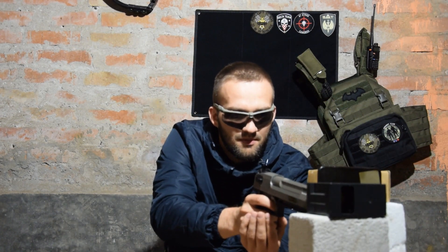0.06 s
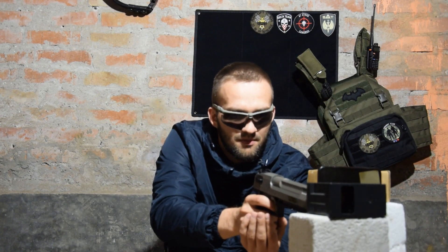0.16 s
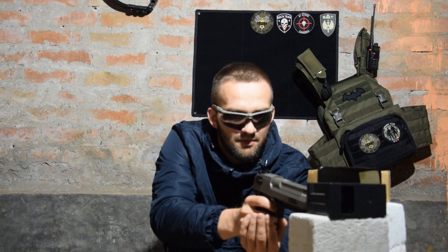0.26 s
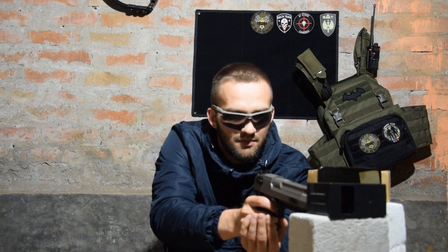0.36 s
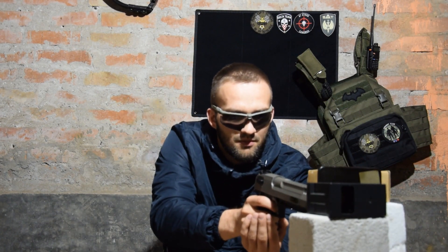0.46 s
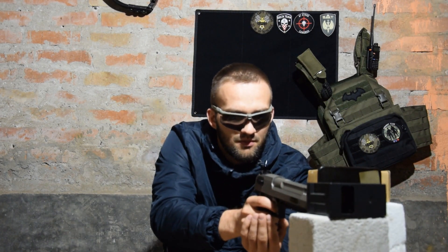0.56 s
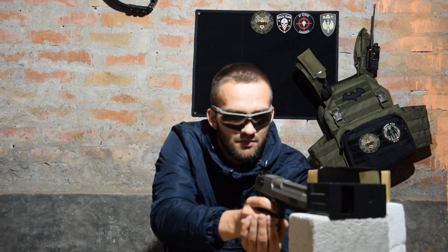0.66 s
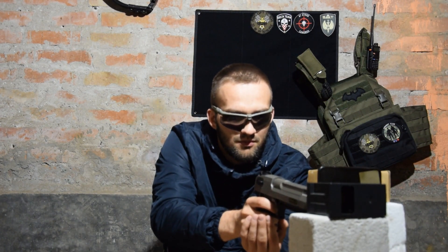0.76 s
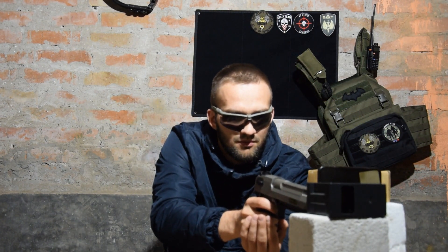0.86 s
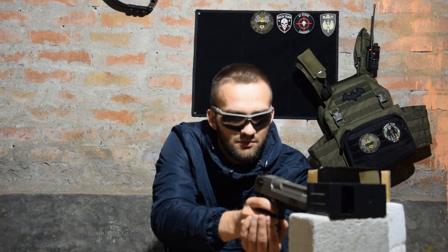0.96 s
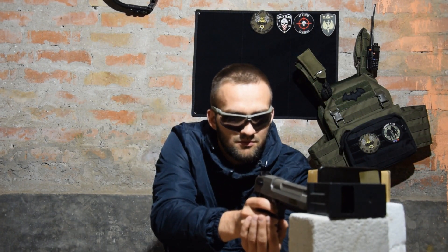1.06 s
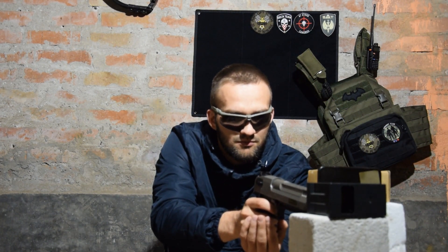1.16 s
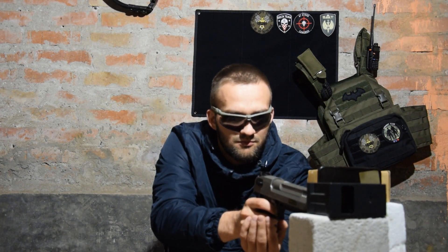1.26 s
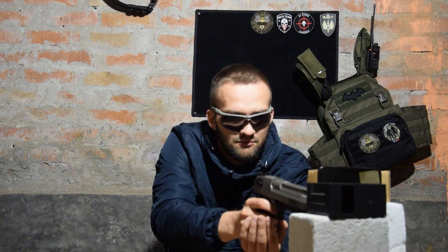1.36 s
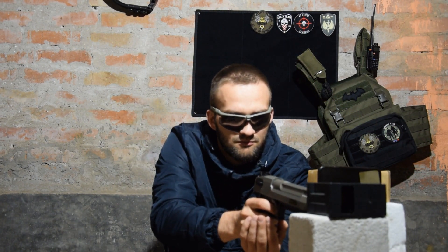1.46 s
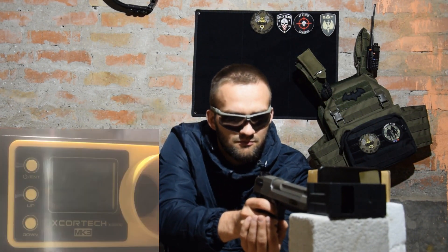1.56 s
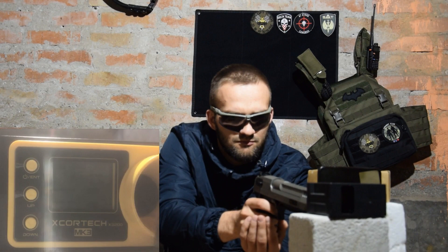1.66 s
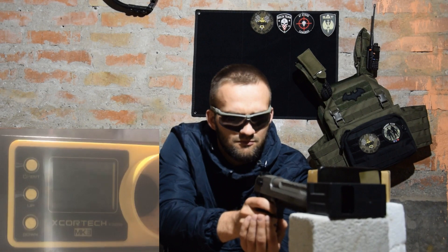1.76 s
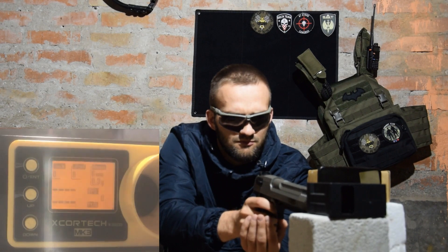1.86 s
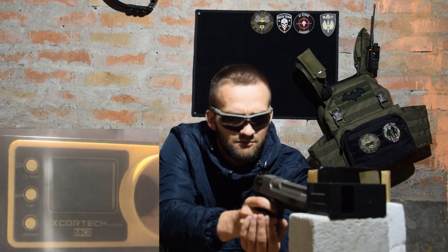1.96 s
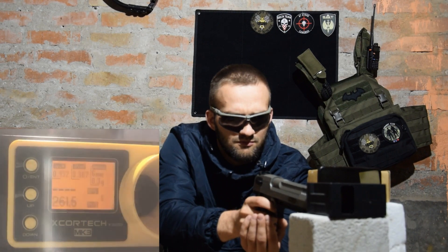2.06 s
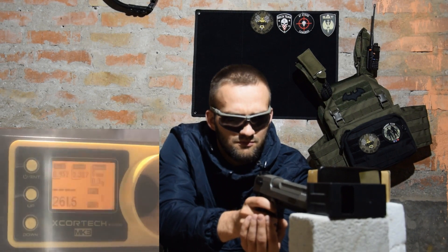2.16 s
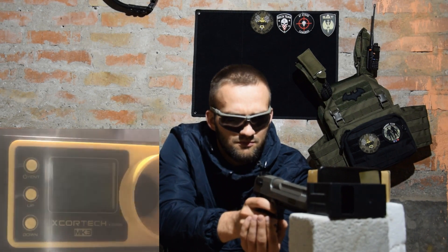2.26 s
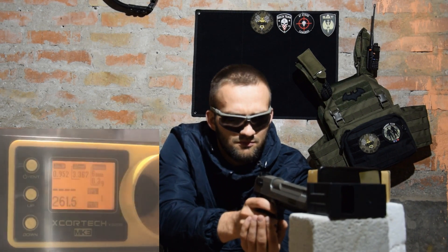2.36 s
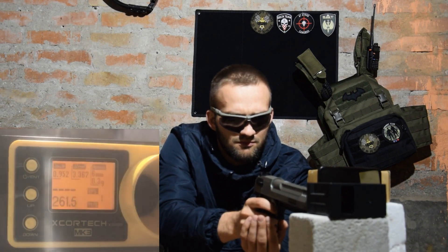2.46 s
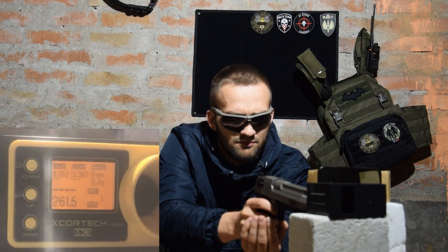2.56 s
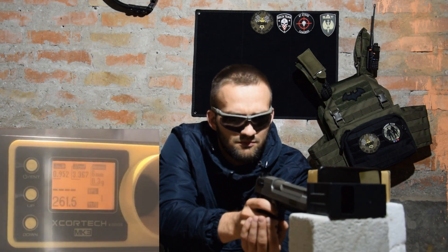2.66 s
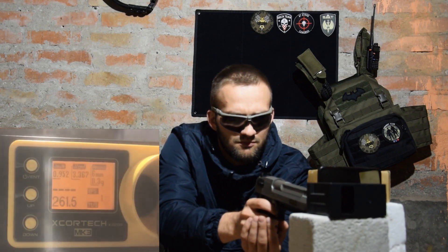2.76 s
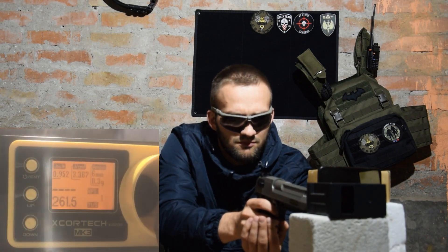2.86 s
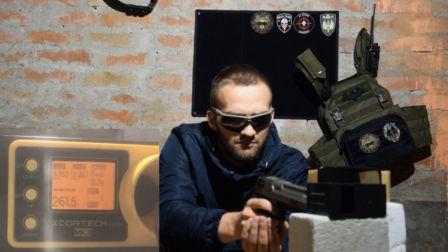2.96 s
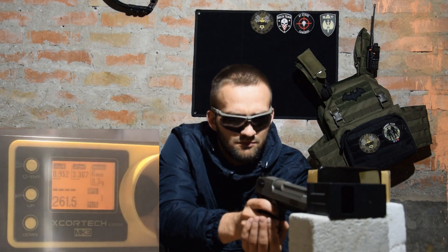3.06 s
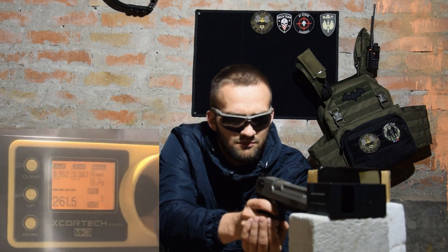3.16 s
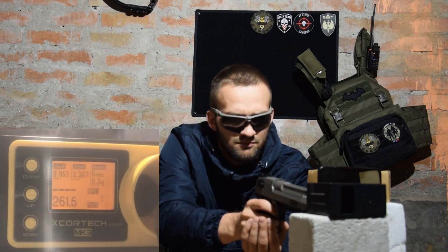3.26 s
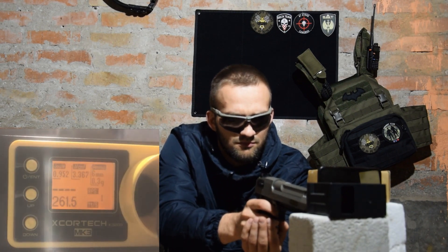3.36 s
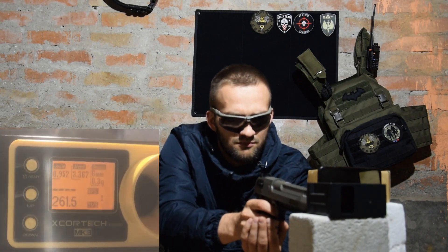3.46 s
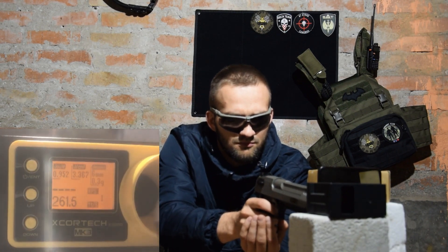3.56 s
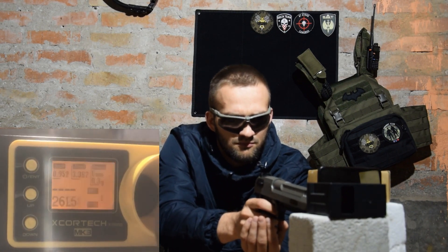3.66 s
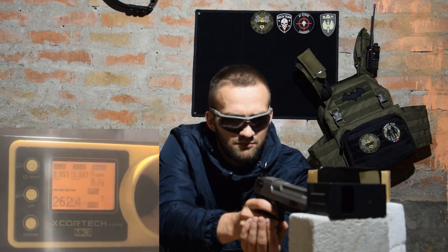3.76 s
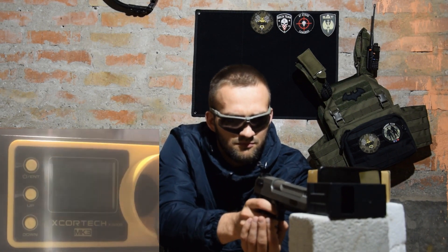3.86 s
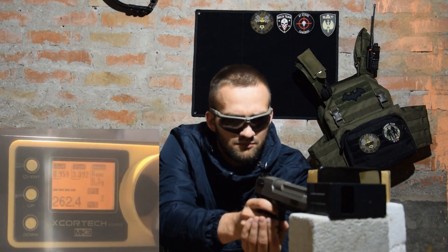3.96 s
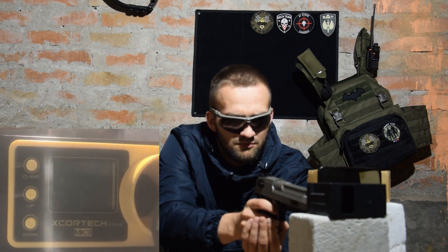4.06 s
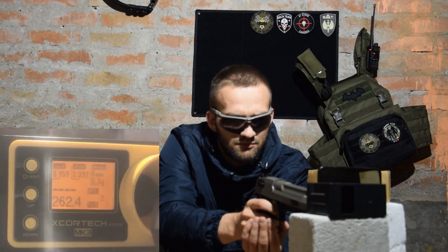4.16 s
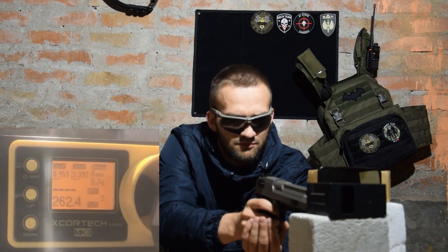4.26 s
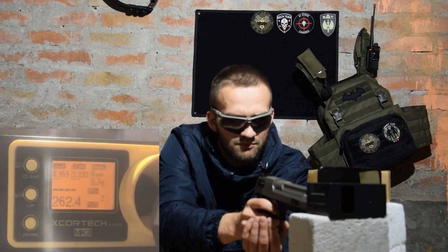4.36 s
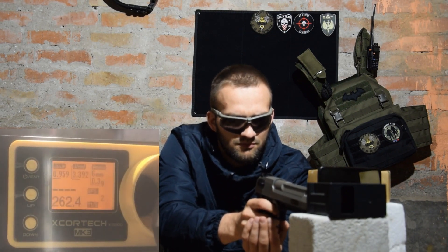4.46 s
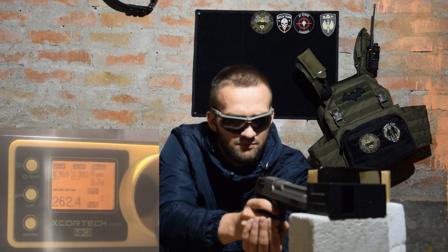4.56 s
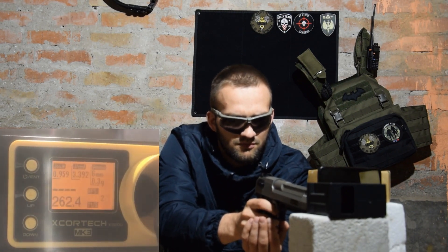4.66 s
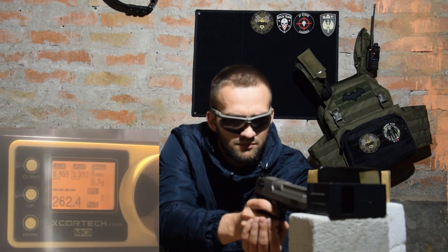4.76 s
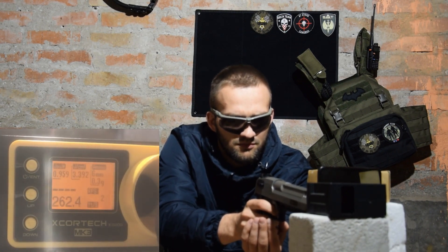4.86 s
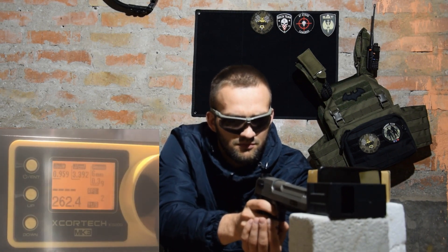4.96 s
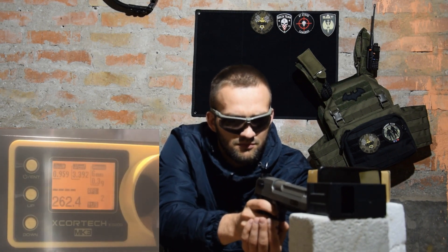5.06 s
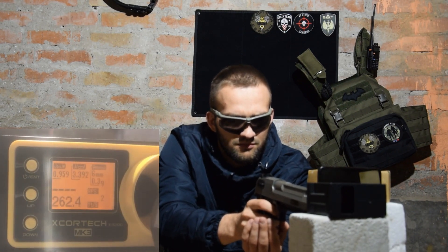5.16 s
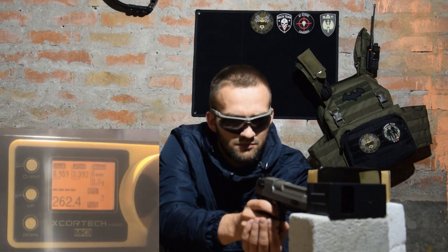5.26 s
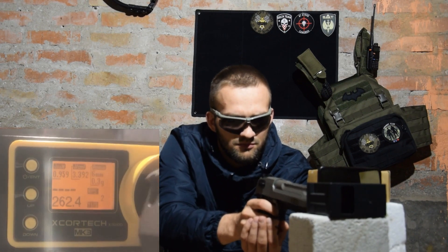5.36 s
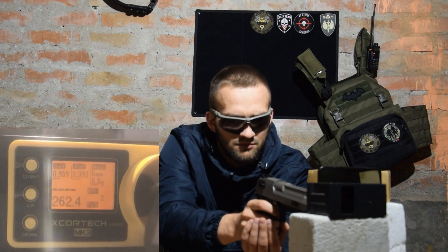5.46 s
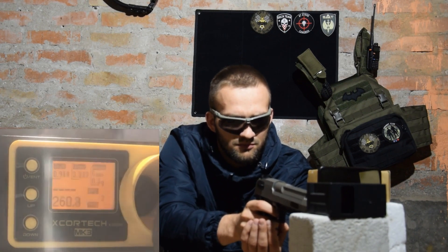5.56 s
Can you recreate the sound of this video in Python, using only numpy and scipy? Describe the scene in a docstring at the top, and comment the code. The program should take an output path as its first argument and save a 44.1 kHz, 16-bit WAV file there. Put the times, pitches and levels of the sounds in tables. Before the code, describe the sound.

A small, hard-walled room is heard through one close microphone, with faint steady hiss, the soft whirring of a small appliance and a very thin high whine throughout. Only this background sounds until about 1.7 seconds, when a faint double tick leads straight into the first shot of a gas airsoft pistol: a sharp hammer crack, a short burst of gas with a low puff, then the metal slide slamming shut some 60 milliseconds later, ringing briefly and overloading the microphone. Sharp clicks like a ricocheting pellet follow at 2.07 to 2.17 seconds, dull knocks around 2.5, and another click at 2.8. Light ticks and a small click come at 3.2 to 3.5, before the second shot at 3.5. Soft knocks fall at 3.8 and, fainter, 5.0. The third shot fires at 5.3 after another tick, then a padded knock and two hard clicks land around 5.5 to 5.6.

```python
"""A gas blowback airsoft pistol fires in a small brick-walled space, close to one microphone.
Faint hiss, whirring bands (filtered noise) and a thin whine (a sine) run throughout; a double tick precedes
the first shot. Three shots follow, about 1.8 s apart: hammer blow, gas burst, slide slamming shut, built from
shaped pulses, noise and dying sines that overload the microphone input. After the first shot come sharp clicks,
likely pellets ricocheting, and dull knocks, with more ticks before the later shots and two hard clicks at the end."""
import sys
import numpy as np
from scipy import signal
from scipy.fft import rfft, irfft
from scipy.io import wavfile

SR = 44100
rng = np.random.default_rng(int(sys.argv[2]) if len(sys.argv) > 2 else 0)


def generate_wav(signal):
    """Clip the signal to [-1, 1] and save it as 16-bit WAV at the path in sys.argv[1]."""
    frames = np.transpose(np.atleast_2d(signal))
    scaled = np.clip(frames, -1, 1) * 32767
    pcm = np.round(scaled).astype(np.int16)
    wavfile.write(sys.argv[1], SR, pcm)


N = 248062
# time axis of one event (s)
T = np.arange(int(.7 * SR)) / SR


def amp(db):
    """Decibels to gain."""
    return 10 ** (np.asarray(db) / 20)


def unit(x):
    """Scales to an energy of one."""
    return x / np.sqrt(np.sum(x ** 2) + 1e-20)


def read(points, hz):
    """Reads a table on a log-frequency axis."""
    table_hz, value = np.transpose(points)
    return np.interp(np.log(hz + 1), np.log(table_hz + 1), value)


def add(mix, start_s, sound):
    """Mixes a sound in at its start time."""
    part = mix[round(start_s * SR):][:len(sound)]
    part += sound[:len(part)]


def through(x, response):
    """Convolves and keeps the length."""
    return signal.fftconvolve(x, response)[:len(x)]


def pulse(spectrum, tilt_db=0, treble_db=0, size=4096):
    """A causal pulse of unit energy with the given spectrum, tilted in dB per octave above 500 Hz."""
    hz = abs(np.fft.fftfreq(size, 1 / SR))
    tilt = tilt_db * np.log2(np.maximum(hz, 500) / 500)
    treble = treble_db * np.clip((hz - 8000) / 2000, 0, 1)  # shelf, full from 10 kHz up
    log_gain = np.log(amp(read(spectrum, hz) + tilt + treble))
    # minimum phase puts the energy at the start
    shape = np.fft.ifft(np.exp(np.conj(signal.hilbert(log_gain)))).real
    return unit(np.pad(shape[:size // 2], (0, len(T) - size // 2)))


def ring(modes):
    """Dying sines of unit energy."""
    return unit(sum(amp(db - 60 * T / t60) * np.sin(2 * np.pi * hz * T) for hz, db, t60 in modes))


def resound(modes, rise_s, pitch=1):
    """Modes that build up over many reflections, so they start softly and out of step."""
    waves = 0
    for hz, db, t60 in modes:
        cycles = pitch * hz * T + rng.random()
        waves = waves + amp(db - 60 * T / t60) * np.sin(2 * np.pi * cycles)
    return unit(waves * (1 - np.exp(-T / rise_s)))


def burst(delay_s, rise_s, hold_s, t60_s):
    """Turbulence: noise that swells, holds and dies away."""
    age = np.maximum(T - delay_s, 0)
    swell = 1 - np.exp(-age / rise_s)
    fade = amp(-60 * np.maximum(age - hold_s, 0) / t60_s)
    return rng.standard_normal(len(T)) * swell * fade


def contact(length_s):
    """The brief rough contact of two hard parts: dying noise, evened in spectrum, then faded further."""
    z = rfft(rng.standard_normal(len(T)) * amp(-60 * T / length_s))
    even = irfft(z / (abs(z) + 1e-9), len(T))
    return unit(even * amp(-20 * T / length_s))


# decay of the walled space, columns: pitch_hz, t60_s
ROOM_DECAY = [(100, 0.2), (400, 0.34), (1000, 0.26), (3000, 0.23), (6500, 0.22), (10000, 0.17),
              (16000, 0.1546)]
# low standing waves between the walls, columns: pitch_hz, level_db, t60_s
STANDING_WAVES = [(135, 0, .6), (151, -2, .42), (245, -9, .35), (345, -7, .28), (410, -5, .28)]


def room(direct_db, boom_db, build_s=0.00068, wall_s=0.0096, wall_db=-17):
    """One path to the microphone: direct sound, a wall echo, a dense tail and low standing waves."""
    hz, t, z = signal.stft(rng.standard_normal(len(T)), SR, nperseg=256)
    fading = z * amp(-60 * t / read(ROOM_DECAY, hz)[:, None])
    tail = signal.istft(fading, SR, nperseg=256)[1][:len(T)]
    path = unit(tail * (1 - np.exp(-T / build_s))) + amp(boom_db) * ring(STANDING_WAVES)
    path[0] += amp(direct_db)
    path[round(wall_s * SR)] += amp(wall_db)
    return unit(path)


# spectrum of the steady room noise, columns: pitch_hz, level_db
HISS_SPECTRUM = [(20, -5.5), (60, 1.5), (200, -0.5), (500, -4), (800, -9.5), (1200, -6.5), (1800, -12.5),
                 (2800, -15), (3400, -24.5), (6800, -20.5), (8200, -25.5), (11000, -32.5), (16000, -37)]
# whirring bands, columns: pitch_hz, width_hz (half amplitude at 0.55 width either side), level_db (rms)
WHIR_BANDS = [(2850, 460, -74.5), (3715, 160, -67.5), (3920, 210, -63.5), (4470, 300, -70),
              (5334, 340, -68), (6230, 310, -78.5), (6810, 450, -76.5)]


def background(hiss_db=-61, whine_hz=15682, whine_db=-84):
    """Steady room noise, the whirring bands of a small appliance and a thin electronic whine."""
    hz = np.fft.rfftfreq(N, 1 / SR)
    power = amp(hiss_db) ** 2 * unit(amp(read(HISS_SPECTRUM, hz))) ** 2
    for centre_hz, width_hz, db in WHIR_BANDS:
        band = unit(1 / (1 + ((hz - centre_hz) / (0.55 * width_hz)) ** 2))
        power = power + (amp(db) * band) ** 2
    noise = irfft(rfft(rng.standard_normal(N)) * np.sqrt(power * len(hz)), N)
    whine = np.sqrt(2) * np.sin(2 * np.pi * whine_hz * np.arange(N) / SR)
    return noise + amp(whine_db) * whine


# spectrum of a padded blow, columns: pitch_hz, level_db
KNOCK_SPECTRUM = [(40, -44), (130, -6), (200, -9), (370, -2), (650, -4.5), (900, 3.5), (1250, -0.5),
                  (1650, 4), (3000, -5.5), (6500, -17), (10000, -35), (16000, -53)]
# dull knocks, columns: start_s, level_db, tilt_db (per octave)
KNOCK_EVENTS = [(2.46, -8, -1.5), (2.556, -12.5, 1), (3.790, -13, -1), (4.983, -21.5, -4.5),
                (5.49, 5.5, 1.5)]


def knocks():
    """Padded blows whose contact lasts some milliseconds."""
    out = np.zeros(N)
    for start_s, db, tilt_db in KNOCK_EVENTS:
        hit = through(contact(length_s=0.037), pulse(KNOCK_SPECTRUM, tilt_db))
        add(out, start_s, amp(db) * unit(through(hit, room(direct_db=-8.0, boom_db=-10))))
    return out


# spectrum of a small hard impact, for ticks and clicks, columns: pitch_hz, level_db
CLICK_SPECTRUM = [(60, -46), (200, -30.5), (330, -22.5), (600, -19), (1100, -8), (1600, -4), (2100, -2.5),
                  (3000, 2), (4800, 1.5), (7200, 8), (8300, 1), (10000, -13), (13000, -27.5), (16000, -40)]
# faint double ticks of the trigger and grip, columns: start_s, level_db, tilt_db (per octave)
TICK_EVENTS = [(1.691, -29, -6), (3.2016, -24.5, 8), (3.4597, -30, 7), (5.299, -23.5, -10)]


def ticks(gap_s=.008, second_db=-3):
    """Small parts of the pistol shift in the hand: each catches, then settles with a second tick."""
    out = np.zeros(N)
    for start_s, db, tilt_db in TICK_EVENTS:
        tick = through(pulse(CLICK_SPECTRUM, tilt_db, treble_db=4.5), contact(length_s=.008))
        tick = unit(through(tick, room(direct_db=-0.5, boom_db=-27.5)))
        add(out, start_s, amp(db) * tick)
        add(out, start_s + gap_s, amp(db + second_db) * tick)
    return out


# short high ping of small hard parts, for clicks, sear and hammer, columns: pitch_hz, level_db, t60_s
PING_MODES = [(6134, 0.5, 0.025), (6654, -1.5, 0.027), (7090, 2.5, 0.0074)]
# ringing of whatever is struck, columns: pitch_hz (before pitch_factor), level_db, t60_s
STRUCK_MODES = [(510, -12, .16), (921, 0, .19), (1580, -1, .13), (2400, 0, .13), (3080, -2, .14),
                (3570, -5, .14), (5610, -7, .15), (6130, -5, .1), (6650, -5, .15)]
# sharp clicks, columns: start_s, level_db, tilt_db (per octave), treble_db (shelf from 8 to 10 kHz),
# ring_db (relative to level_db), pitch_factor, direct_db (direct sound)
CLICK_EVENTS = [(2.0672, 9, 1, 7.5, -24.5, 1.08, -8), (2.1379, 13, -4.5, -17, -10, 1.29, -0.5),
                (2.1686, 14, -2.5, 10, -10, 0.99, 0.5), (2.7829, 5, -2, 3.5, -19.5, 1.25, -4),
                (3.2665, -2, -3.5, -2, -17.5, 1.25, -4.5), (5.4930, 18, -3, 4.5, -8.5, 1.005, -9),
                (5.589, 16, -4, -9, -27, 1.3, -7.5)]


def clicks():
    """Hard little impacts, each in another spot of the room; what is struck rings briefly."""
    out = np.zeros(N)
    for start_s, db, tilt_db, treble_db, ring_db, pitch, direct_db in CLICK_EVENTS:
        impact = pulse(CLICK_SPECTRUM, tilt_db, treble_db) + amp(-17) * ring(PING_MODES)
        hit = through(impact, contact(length_s=0.019))
        path = room(direct_db, boom_db=-22, build_s=0.00095, wall_db=-15)
        add(out, start_s, amp(db) * unit(through(hit, path)))
        add(out, start_s, amp(db + ring_db) * resound(STRUCK_MODES, rise_s=0.0032, pitch=pitch))
    return out


# spectrum of the metal slide, also used for the sear, columns: pitch_hz, level_db
SLIDE_SPECTRUM = [(60, -13.5), (200, -18), (400, -19), (800, -13.5), (1300, 0), (1600, -0.5), (1950, -4),
                  (2600, 0.5), (5000, 0.5), (7400, 1.5), (9500, -11), (12000, -18), (16000, -25.5)]


def sear_and_swing(metal, blow_s):
    """The sear lets go and the hammer swings, two ticks just ahead of the blow."""
    tick = pulse(SLIDE_SPECTRUM, tilt_db=-3.0, treble_db=-10.5) + amp(-10.5) * ring(PING_MODES)
    for lead_s, db in (0.0066, -3), (.0027, 4):
        add(metal, blow_s - lead_s, amp(db) * unit(through(tick, contact(length_s=0.014))))


# spectrum of the hammer blow, columns: pitch_hz, level_db
HAMMER_SPECTRUM = [(100, -10.5), (400, -15.5), (1000, -3.5), (2500, -3), (5000, -8), (6500, -0.5),
                   (7700, -4.5), (9500, -17), (16000, -34)]
# ringing of the pistol frame, for hammer and slide, columns: pitch_hz, level_db, t60_s
FRAME_MODES = [(2452, -1, 0.16), (2630, -0.5, .17), (3176, -2.5, 0.11), (4270, 3, 0.13), (5670, 1, 0.15),
               (5890, -0.5, 0.11), (6380, -1.5, 0.18), (6674, -0.5, 0.18), (7600, -6, 0.1)]


def hammer(metal, ringing, blow_s, blow_db=30.5, ring_db=19):
    """The hammer strikes the valve: a sharp pulse with a ping, and the frame rings."""
    blow = pulse(HAMMER_SPECTRUM) + amp(-2.0) * ring(PING_MODES)
    add(metal, blow_s, amp(blow_db) * unit(blow))
    add(ringing, blow_s, amp(ring_db) * resound(FRAME_MODES, rise_s=0.0028))


# spectrum of the venting gas, columns: pitch_hz, level_db
GAS_SPECTRUM = [(100, -12), (500, -11), (1500, -5), (2500, -1), (4500, 0.5), (6300, 2), (7700, -3),
                (9500, -11), (16000, -32.5)]
# spectrum of the low puff of air, columns: pitch_hz, level_db
PUFF_SPECTRUM = [(20, -24.5), (80, -11.5), (145, -3.5), (230, 0.5), (370, 0), (470, -2), (620, -3.5),
                 (1000, -14), (3000, -37)]
# hollow ring excited by the puff, columns: pitch_hz, level_db, t60_s
HOLLOW_MODES = [(148, -9, .24), (340, -4, .1), (385, 0, .09), (450, -1, .09), (540, -7, .12),
                (688, -5, .12), (867, -9, .1)]


def gas_burst(gas, ringing, blow_s, weight_db):
    """Gas vents as turbulent noise; its first push of air is one low puff with a hollow ring."""
    jet_db, puff_db, hollow_db, puff_lag_s = 27, 13.5, 20.5, .006
    # the jet has mostly died away before the slide returns
    jet = burst(delay_s=.004, rise_s=.003, hold_s=.022, t60_s=.06)
    add(gas, blow_s, amp(jet_db) * unit(through(jet, pulse(GAS_SPECTRUM))))
    add(gas, blow_s + puff_lag_s, amp(puff_db + weight_db) * pulse(PUFF_SPECTRUM))
    add(ringing, blow_s + puff_lag_s, amp(hollow_db) * resound(HOLLOW_MODES, rise_s=0.0007))


# ringing of the recoil spring, columns: pitch_hz, level_db, t60_s
SPRING_MODES = [(1130, -9, .17), (1338, 0, .17), (1375, -4, .16), (1650, -8, .15)]


def slide_home(metal, ringing, home_s, spring_db):
    """The slide hits home and chatters as it seats; frame and recoil spring ring on."""
    slam_db, ring_db, spring_lag_s = 27, 11, .0067
    chatter = unit(burst(delay_s=.003, rise_s=.001, hold_s=.009, t60_s=.12))
    seating = contact(length_s=.015) + chatter
    add(metal, home_s, amp(slam_db) * unit(through(pulse(SLIDE_SPECTRUM), seating)))
    add(ringing, home_s, amp(ring_db) * resound(FRAME_MODES, rise_s=0.002))
    add(ringing, home_s + spring_lag_s, amp(spring_db) * resound(SPRING_MODES, rise_s=.006))


# shots, columns: start_s (hammer blow), weight_db (added to the low puff), spring_db (recoil spring ring)
SHOT_EVENTS = [(1.7299, -0.5, 15.5), (3.5259, 5, -3), (5.3178, -2, 12.5)]


def pistol(cycle_s=.0597, slowing_s=.0027):
    """The hammer knocks the valve open, gas drives pellet and slide, and the spring slams the slide shut."""
    metal, gas, ringing = np.zeros((3, N))
    for fired, (blow_s, weight_db, spring_db) in enumerate(SHOT_EVENTS):
        sear_and_swing(metal, blow_s)
        hammer(metal, ringing, blow_s)
        gas_burst(gas, ringing, blow_s, weight_db)
        # the slide comes back a little later each time, as the gas cools
        home_s = blow_s + cycle_s + slowing_s * fired
        slide_home(metal, ringing, home_s, spring_db)
    # body and muzzle each have their own path through the room
    body = through(metal, room(direct_db=-1, boom_db=-26.5))
    muzzle = through(gas, room(direct_db=-2, boom_db=-30.5))
    return ringing + body + muzzle


def scene():
    """Everything at one microphone, from the background to the pistol close by."""
    return (background() + knocks() + ticks() + clicks() + pistol())[None]


def record(dry, ceiling=0.58, low_cut_hz=38, band_limit_hz=16000):
    """The microphone's input stage flattens the peaks of the shots; then a low cut and the band limit."""
    # double sample rate while flattening
    fine = signal.resample_poly(dry, 2, 1, axis=1) / ceiling
    flat = ceiling * fine / (1 + fine ** 8) ** (1 / 8)
    flat = signal.resample_poly(flat, 1, 2, axis=1)
    thinned = signal.lfilter(*signal.butter(1, low_cut_hz, "high", fs=SR), flat)
    lowpass = signal.firwin(255, band_limit_hz, window=("kaiser", 9), fs=SR)
    return signal.oaconvolve(thinned, lowpass[None], "same")


dry = scene()
out = record(dry)
generate_wav(out)
```